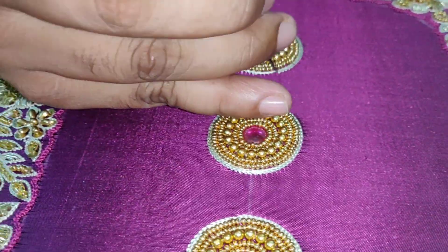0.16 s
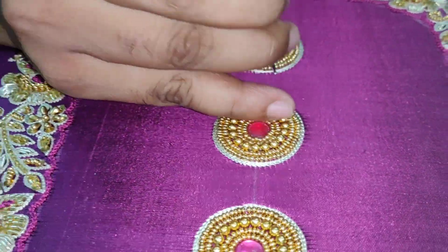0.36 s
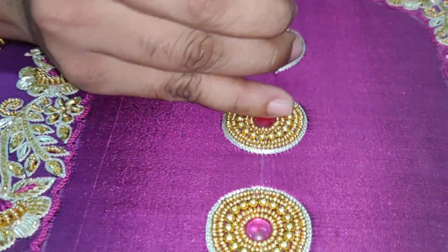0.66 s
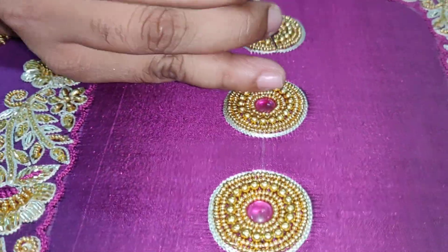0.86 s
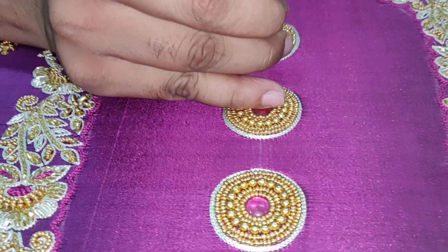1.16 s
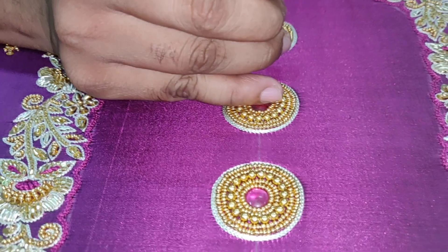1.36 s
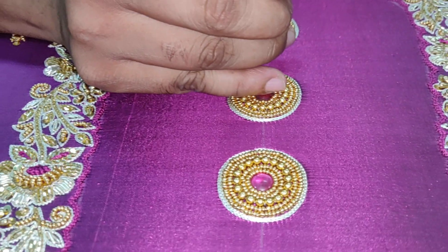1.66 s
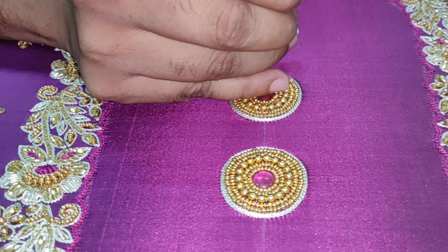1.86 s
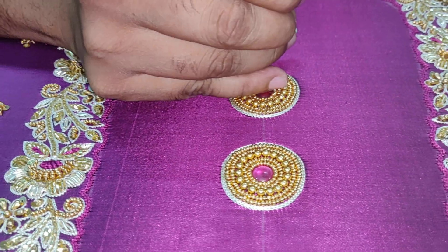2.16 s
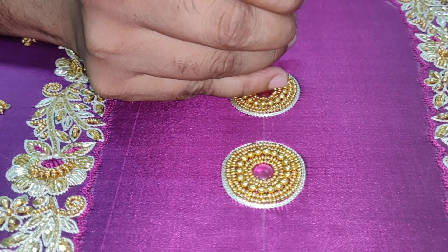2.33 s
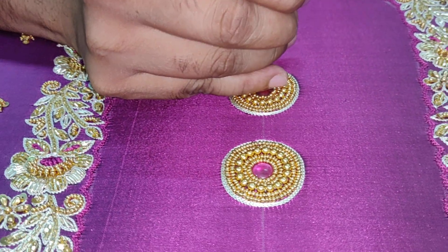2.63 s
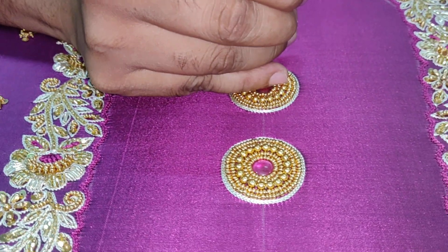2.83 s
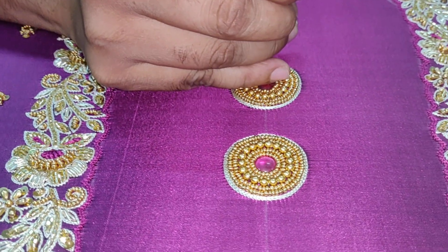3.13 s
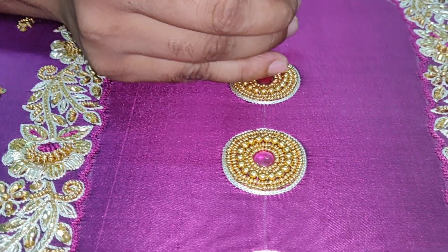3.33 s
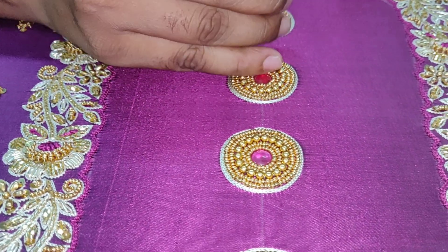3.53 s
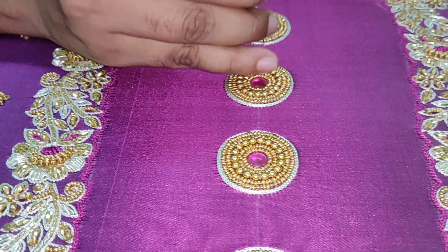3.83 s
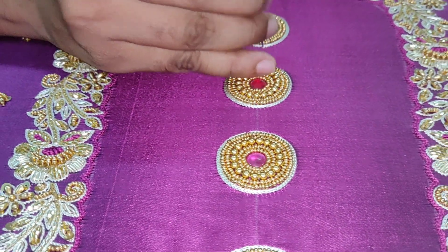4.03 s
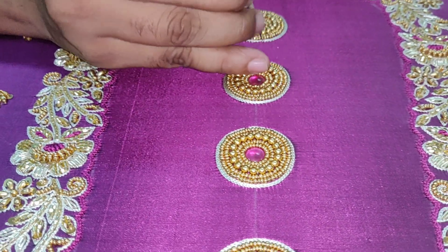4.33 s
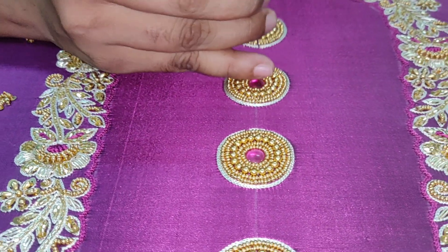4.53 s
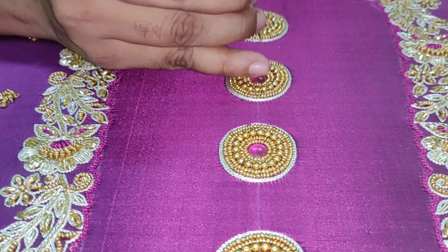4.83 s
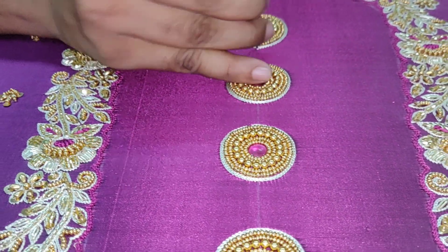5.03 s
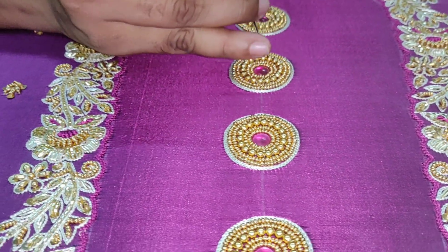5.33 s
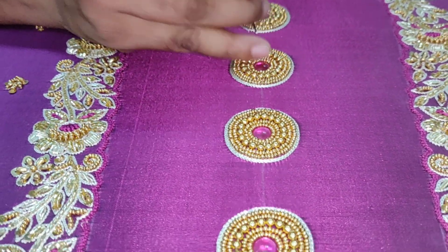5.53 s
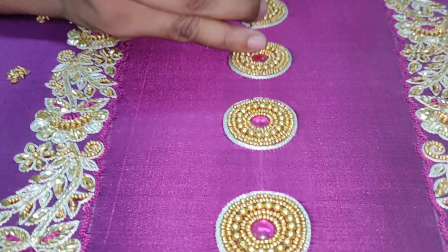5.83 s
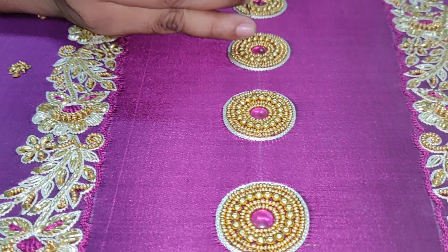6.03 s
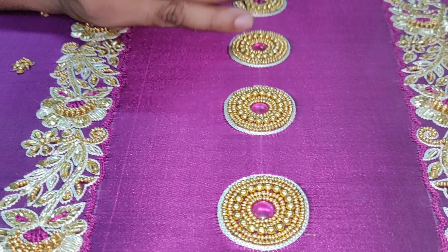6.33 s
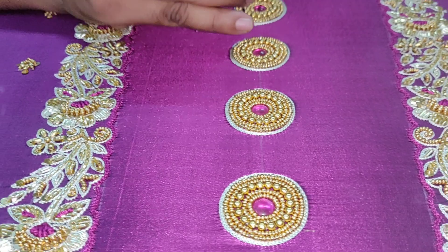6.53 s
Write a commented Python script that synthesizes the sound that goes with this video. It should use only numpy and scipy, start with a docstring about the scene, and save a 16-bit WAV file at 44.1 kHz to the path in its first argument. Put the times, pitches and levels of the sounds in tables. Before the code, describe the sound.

Close up in a small, hard room, a needle pierces taut cloth with a few hollow taps and crisp pops. A quieter stretch follows, with thread sliding and rasping, a few bead clicks and small ticks from the grip on the microphone. The needle then returns with a longer series of quick, soft knocks, the last ones strongest. A faint, high ringing hiss lies underneath throughout.

```python
"""A hooked embroidery needle is stabbed through silk stretched on a wooden frame, near a hand-held phone.
Each pass pops the weave and sets the cloth ringing in its membrane modes, like a slack drum.
Between stitches, thread is drawn through with stick-slip friction, beads click and the hand rubs the silk.
A small hard room adds reverberation. The grip on the phone ticks beside its right microphone port,
and the left port resonates faintly in its own hiss."""
import sys
import numpy as np
from scipy import signal
from scipy.fft import rfft, irfft
from scipy.io import wavfile
from scipy.ndimage import uniform_filter1d

SR = 44100
rng = np.random.default_rng(int(sys.argv[2]) if len(sys.argv) > 2 else 0)


def waveform_to_disk(signal):
    """Save audio, clipped to [-1, 1], as 16-bit WAV at the path in sys.argv[1]."""
    frames = np.transpose(np.atleast_2d(signal))
    scaled = np.clip(frames, -1, 1) * 32767
    samples = np.round(scaled).astype(np.int16)
    wavfile.write(sys.argv[1], SR, samples)


N = 294588
T = np.arange(N) / SR

# The thread snags on a bead, which clicks, and rasps free. Levels in all tables are relative.
# (time [s], click level [dB], click treble [dB], rasp level [dB], time constant of the tension [s])
BEAD_SNAGS = [(1.5957, -25.5, -6, -49, 0.044), (1.7206, -13.5, 1, -43, 0.062),
              (1.8103, -23, 1.5, -66, 0.085), (1.858, -35, 6, -66, 0.022), (2.733, -31.5, -7, -60, 0.024),
              (2.875, -37, 0, -81, .02), (3.209, -39, -2, -67.5, 0.064), (3.277, -38, 4, -66, 0.27),
              (3.765, -43, -2, -55, 0.058)]


def undb(db):
    """Decibels to amplitude ratio."""
    return 10 ** (np.asarray(db) / 20)


def unit(x):
    """Scale to rms 1."""
    return x / np.sqrt(np.mean(x ** 2))


def add(out, start_s, x):
    """Superpose x on out from start_s."""
    i = max(int(round(start_s * SR)), 0)
    out[i:i + len(x)] += x[:max(N - i, 0)]


def colour(x, points, column=1, size=8192):
    """Minimum-phase filter through points of (frequency [Hz], gain [dB])."""
    points = np.array(points, float)
    hz = np.maximum(np.arange(size // 2 + 1) * SR / size, 1)
    gain_db = np.interp(np.log(hz), np.log(points[:, 0]), points[:, column])
    cepstrum = irfft(np.log(undb(gain_db)))
    cepstrum[1:size // 2] *= 2  # folding the cepstrum makes the filter causal
    cepstrum[size // 2 + 1:] = 0
    impulse_response = irfft(np.exp(rfft(cepstrum)))
    return signal.fftconvolve(x, impulse_response)[:len(x)]


def brighten(x, db):
    """Shelving filter: raise or lower the treble by db."""
    return colour(x, [(5800, 0), (8500, db)], size=512)


def fade(t, t60):
    """Exponential decay, 60 dB down after t60."""
    return undb(-60 * t / t60)


def linger(x, decay_s):
    """Leaky integrator: each impulse falls to 1 / e in decay_s."""
    return signal.lfilter([1], [1, -np.exp(-1 / (decay_s * SR))], x)


def walk(rate_hz):
    """Smooth random modulation of rms 1: random steps, averaged twice."""
    hold = int(SR / rate_hz)
    steps = np.repeat(rng.standard_normal(N // hold + 1), hold)
    return unit(uniform_filter1d(uniform_filter1d(steps, hold), hold)[:N])


def pair(mid, side):
    """Left and right from mid and side."""
    return np.array([mid + side, mid - side])


def snap(t, t60, tail_db, tail_t60):
    """Noise with a two-stage decay: a sharp burst, then a short rustle."""
    return rng.standard_normal(len(t)) * (fade(t, t60) + undb(tail_db) * fade(t, tail_t60))


def slipping(spectrum, grain_db, flutter_db):
    """Stick-slip friction: stereo noise modulated by tiny slips that come in uneven runs."""
    slips = unit(undb(grain_db * walk(700) + flutter_db * walk(45)))
    return np.array([unit(colour(slips * rng.standard_normal(N), spectrum)) for _ in range(2)])


def needle_knocks(catch_pop_db=-7, catch_contact_ratio=2.17):
    """Needle impacts: (time, direction +1 in / -1 out, thump, pop, contact, deepest mode, treble)."""
    # The point goes in with one knock; the softest rows are the hand pressing lightly on the cloth just before
    # a stab: # (time [s], thump level [dB], pop level [dB], contact time [ms], deepest mode [dB], pop treble
    # [dB])
    stabs = [(0.096, -20, -58, 18, 6, 0), (.132, -33, -26, 1.9, 1, 3), (0.2971, -20, -13.5, 0.78, 0.5, 0.5),
             (.678, -18.5, -11, 0.7, 2, 0.5), (1.053, -20, -14, 0.45, 0.5, -2),
             (3.409, -26.5, -54, 2.3, 1, 0), (3.824, -31, -69, 1.2, -3, 0),
             (3.852, -32.5, -50, 0.94, -2.5, 0), (4.101, -30, -48, 2.2, 0.5, 0),
             (4.297, -35, -60, 2.7, 4.5, 0), (4.651, -19.5, -42, 2.04, 2, 5), (4.823, -32, -65, 1.8, 4, 0),
             (5.061, -21, -22, 0.44, -0.5, -9), (5.433, -27.5, -42, 2.2, -0.5, 9),
             (5.456, -27.5, -34.5, 0.78, -1, -3), (5.632, -25.5, -55, 4, -0.5, 2),
             (5.823, -20.5, -36, 1.7, -3.5, -10), (6.193, -20, -25, 1.7, -4, -11)]
    # The hook comes out, catches and knocks again, duller:
    # (the columns of stabs, delay of the second knock [s], its level against the first [dB])
    lifts = [(0.142, -24.5, -24, 1.96, 7, 3.5, 0.011, -11), (0.5142, -24, -32.5, 1.37, 5, 9.5, 0.015, -2),
             (0.8861, -18, -23.5, 0.89, -1.5, 1, 0.014, 4), (3.734, -25, -56, 3.9, 1.5, 2, 0.022, -21),
             (4.3335, -18, -16.5, 0.73, 1, -2.5, .019, -1.5), (4.8582, -22, -33.5, 1.45, 0.5, 1, 0.02, 3),
             (5.2782, -14, -18, 1.04, -2, -3, .013, -4), (5.6646, -12.5, -13.5, 1.08, -7, -1.5, 0.014, -7),
             (6.032, -14.5, -40, 2.4, -3.5, 6, 0.015, -10), (6.406, -11.5, -38.5, 2.17, -5, 5, 0.016, -13)]
    knocks = [(start, 1, *rest) for start, *rest in stabs]
    for start, thump, pop, contact, deep, treble, delay, catch_db in lifts:
        knocks.append((start, -1, thump, pop, contact, deep, treble))
        knocks.append((start + delay, -1, thump + catch_db, pop + catch_db + catch_pop_db,
                       contact * catch_contact_ratio, deep, treble))
    return knocks


def air(level_db=-51, swell_db=2):
    """Ambient noise: the still room's low rumble, partly coherent between the two ports."""
    # Spectrum of the still room: (frequency [Hz], level [dB])
    spectrum = [(20, 10.5), (55, -5.5), (100, -8), (170, -19), (420, -19.5), (650, -33.5), (1200, -29),
                (2200, -38), (5000, -36.5), (10000, -62), (16000, -44)]
    mid, side = (unit(colour(rng.standard_normal(N), spectrum)) for _ in range(2))
    side = colour(side, [(60, -1.5), (400, -1), (1500, -2)])
    return undb(level_db + swell_db * walk(4.17)) * pair(mid, side)


def room(x, t60=0.66, wet_db=-12.5, build_s=0.0095):
    """Diffuse reverberation: each side of the frame reaches each port by its own decaying tail."""
    # Colour of the reflections: (frequency [Hz], gain [dB])
    walls = [(40, -14.5), (150, 1), (380, -5), (510, 7.5), (590, 2.5), (750, 5.5), (2000, 1), (6000, 1),
             (16000, 0)]
    t = np.arange(SR * 3 // 4) / SR
    build_up = 1 - np.exp(-(t / build_s) ** 2)
    tails = rng.standard_normal((2, 2, len(t))) * fade(t, t60) * build_up
    tails /= np.sqrt(np.sum(tails ** 2, axis=(1, 2), keepdims=True))
    sent = np.array([colour(side, walls) for side in x])
    reflections = [signal.fftconvolve(sent, paths, axes=1).sum(0)[:N] for paths in tails]
    return undb(wet_db) * np.array(reflections)


def grip(small_db=-43, spread_db=5, small_ms=0.58, gain_db=0.5, rise_fraction=0.096, leak_hz=80,
         calm_per_s=7, restless_per_s=85):
    """Pressure pulses: the grip sends one-sided spikes into the right port; longer ones are duller."""
    # Strong ticks of the grip: (time [s], level [dB], decay time [ms])
    strong_ticks = [(.06, -20.5, 0.54), (.2291, -10.5, 0.044), (0.3945, -19.5, 0.11), (.421, -30, 0.13),
                    (.572, -30, 0.14), (.8102, -15, 0.31), (0.956, -27.5, 0.7), (1.1935, -25, 1),
                    (1.2639, -23.5, 0.72), (1.3132, -19.5, 0.56), (1.39, -30, .2), (1.4025, -24, 0.22),
                    (1.4102, -16.5, 0.51), (1.417, -26, 1), (1.518, -24.5, .3), (1.557, -21.5, 0.11),
                    (1.6638, -23.5, 0.54), (2.2452, -26, 1), (2.3674, -19.5, 0.4), (2.441, -26, 1),
                    (2.5696, -29.5, 1), (2.6046, -19, 0.76), (2.6646, -31, 0.23), (3.5219, -25.5, 0.59),
                    (4.0018, -27, 0.32), (4.9248, -28, 0.28), (5.1952, -25, 0.06)]
    # The grip shifts while the long thread is drawn: (start [s], end [s])
    restless_spans = [(1.15, 1.7), (2.3, 3.0)]
    restless = sum((T > start) & (T < end) for start, end in restless_spans)
    rate = np.where(restless, restless_per_s, calm_per_s)
    times = T[rng.random(N) < rate / SR]
    small_ticks = [(start, small_db + spread_db * min(strength, 2), small_ms * 2 ** stretch)
                   for start, (strength, stretch) in zip(times, rng.standard_normal((len(times), 2)))]
    t_ms = np.arange(SR // 100) * 1000 / SR
    right = np.zeros(N)
    for start, db, decay_ms in strong_ticks + small_ticks:
        spike = np.exp(-t_ms / decay_ms) * (1 - np.exp(-t_ms / (rise_fraction * decay_ms)))
        add(right, start, rng.choice([-1, 1]) * undb(gain_db + db) * spike)
    leak = signal.butter(1, leak_hz, "high", fs=SR, output="sos")
    return np.array([np.zeros(N), signal.sosfilt(leak, right)])


def sway(gain_db=-27, reach_s=0.1, settle_s=0.075, rest_db=-29, uneven_db=3.5):
    """Forced motion: the hand leans on the cloth before each knock; it heaves slowly, then settles."""
    # Spectrum of the heaving: (frequency [Hz], level [dB])
    spectrum = [(8, 5), (25, 2), (55, -2), (110, -15), (400, -30.5), (1500, -47.5), (6000, -69)]
    pushes = np.zeros(N)
    for start, _, thump_db, _, _, deep_db, _ in needle_knocks():
        add(pushes, start, [undb(thump_db + deep_db) ** 2])
    reaching = linger(pushes[::-1], reach_s)[::-1]
    effort = np.sqrt(undb(rest_db) ** 2 + linger(pushes, settle_s) + reaching)
    mid, side = (unit(colour(rng.standard_normal(N), spectrum)) for _ in range(2))
    return undb(gain_db + uneven_db * walk(17)) * effort * pair(mid, 0.3 * side)


def brush():
    """Friction on a membrane: the edge of the hand rubs the taut cloth, which murmurs like a drum skin."""
    # Strokes of the hand as it draws the thread: (centre time [s], half length [s], level [dB])
    strokes = [(1.532, 0.051, -48), (1.66, .04, -53)]
    # Spectrum of the rubbed cloth: (frequency [Hz], level [dB])
    spectrum = [(30, -1), (90, 0), (170, -1), (400, -10.5), (900, -25), (3000, -40)]
    pressure = sum(undb(db) * np.exp(-((T - centre) / half) ** 2) for centre, half, db in strokes)
    return pressure * slipping(spectrum, grain_db=4.5, flutter_db=1.5)


def thread(hiss_db=7, rasp_db=-6, snag_db=1, slack_db=-73.5, slack_rasp_db=-70, right_db=1,
           attack_s=0.041, release_s=0.06):
    """Stick-slip friction: thread hisses through the hole, with a lower, coarser rasp when it snags."""
    # Pulls of the thread: (start [s], length [s], level [dB])
    pulls = [(0.983, 0.25, -62), (1.143, 0.083, -66.5), (1.402, 0.27, -58), (1.445, .09, -60),
             (1.683, 0.097, -59.5), (2.002, 0.53, -61), (2.546, 0.24, -63), (2.892, 0.1, -62),
             (3.003, 0.15, -60), (3.187, 0.18, -64), (3.373, 0.16, -65), (3.721, 0.039, -56),
             (4.33, 0.061, -79), (5.67, 0.17, -66)]
    # Spectra of sliding and of tight thread: (frequency [Hz], level [dB])
    hiss_spectrum = [(1500, -10), (3000, -5.5), (5000, -4), (8000, 0), (10000, 2), (13000, 2.5), (16000, 2)]
    rasp_spectrum = [(250, -5), (400, 5.5), (620, 10.5), (850, 4), (1200, 4.5), (1800, 2.5), (2350, 4.5),
                     (3100, 0.5), (5000, -6.5)]
    speed, tension = np.zeros((2, N))
    for start, length, db in pulls:
        attack = np.clip((T - start) / attack_s, 0, 1)
        release = np.exp(-np.maximum(T - start - length, 0) / release_s)
        speed += undb(db) * attack * release
    for start, _, _, db, relax_s in BEAD_SNAGS:
        tension += undb(db) * (T > start) * np.exp(-np.abs(T - start) / relax_s)
    # Slack thread still rubs a little between pulls.
    hiss_envelope = undb(hiss_db) * np.hypot(speed, undb(slack_db))
    rasp_envelope = np.hypot(undb(rasp_db) * speed + undb(snag_db) * tension, undb(slack_rasp_db))
    hiss = hiss_envelope * slipping(hiss_spectrum, grain_db=1.5, flutter_db=2.2)
    rasp = rasp_envelope * slipping(rasp_spectrum, grain_db=3.5, flutter_db=4)
    balance = undb([[-right_db / 2], [right_db / 2]])
    return hiss * balance + rasp


def beads(gain_db=-7):
    """Hard impacts: beads knock together in short, broadband clicks."""
    # Spectrum of a click: (frequency [Hz], level [dB])
    spectrum = [(300, -12), (1300, 0.5), (2400, -3), (3000, -4.5), (7000, -5.5), (16000, -14)]
    t = np.arange(SR // 10) / SR
    out = np.zeros((2, N))
    for start, db, treble_db, _, _ in BEAD_SNAGS:
        for port in out:
            click = snap(t, t60=0.018, tail_db=-24, tail_t60=0.096)
            add(port, start, undb(gain_db + db) * brighten(click, treble_db))
    return np.array([colour(port, spectrum) for port in out])


def shudder(gain_db=-9, t60=0.14, rise_s=0.0035, width=0.94):
    """Modal overlap: after a quick pass, frame, cloth and beadwork tremble without a clear pitch."""
    # Envelope of the many weak modes of cloth and frame: (frequency [Hz], level [dB])
    spectrum = [(100, -12.5), (220, 11), (350, -3), (520, -4.5), (750, -8), (1100, -14.5), (2500, -18),
                (8000, -36)]
    t = np.arange(SR // 4) / SR
    mid, side = np.zeros((2, N))
    for start, _, thump_db, _, contact_ms, _, _ in needle_knocks():
        strength = undb(gain_db + thump_db) / np.hypot(1, contact_ms)
        envelope = strength * fade(t, t60) * (1 - np.exp(-t / rise_s))
        for part in (mid, side):
            add(part, start, envelope * rng.standard_normal(len(t)))
    return pair(colour(mid, spectrum), width * colour(side, spectrum))


def cloth(gain_db=-4.5, detune_spread=0.048, place_db=2, side_db=-15, spread_s=0.0034):
    """Membrane modes: each knock plucks the cloth; a longer contact excites only the low modes."""
    # Modes of the stretched cloth: (frequency [Hz], level [dB], time to decay by 60 dB [s])
    cloth_modes = [(68.2, 3, 0.086), (150, -5, 0.086), (172.7, -1, 0.051), (240, -21.5, 0.027),
                   (328.2, -19, 0.15), (407.7, -12, 0.078), (456.7, -9.5, 0.072), (502.6, -16, 0.088),
                   (673, -11, 0.044), (770, -12.5, 0.041), (1107, -5, 0.019)]
    hz, mode_db, t60 = np.transpose(cloth_modes)[:, :, None]
    polarity = (-1) ** np.arange(len(cloth_modes))[:, None]  # neighbouring modes swing in opposition
    t = np.arange(SR // 4) / SR
    mid, side = np.zeros((2, N))
    for start, direction, thump_db, _, contact_ms, deep_db, _ in needle_knocks():
        detune, place, pan = rng.standard_normal((3, len(cloth_modes), 1))
        contact_lowpass = 1 / np.hypot(1, 2 * (hz * contact_ms / 1000) ** 2)
        level_db = gain_db + thump_db + mode_db + place_db * place
        gain = direction * polarity * contact_lowpass * undb(level_db)
        gain[0] *= undb(deep_db)  # the deepest mode depends on where the point lands
        modes = gain * np.sin(2 * np.pi * hz * (1 + detune_spread * detune) * t) * fade(t, t60)
        modes *= 1 - np.exp(-t / spread_s)  # the wave needs a moment to spread over the frame
        add(mid, start, modes.sum(0))
        add(side, start, undb(side_db) * (pan * modes).sum(0))
    return pair(mid, side)


def weave(gain_db=-9, crack_db=13, crack_hz=5800, crack_t60=0.0011, echo_s=0.0036, echo_db=-14,
          width=0.73):
    """Sudden stress release: the tip cracks through the weave with a pop, and fibres slip after it."""
    # The weave giving way: (frequency [Hz], level going in [dB], level coming out [dB])
    spectra = [(200, -5, 6), (644, 2, -5), (920, -1, -19), (1580, -9, -6), (1730, 0.5, -1.5),
               (2430, -9.5, -5.5), (2630, 3.5, -1), (4320, -9, -5), (6240, -8.5, -6.5), (10400, -2, 1),
               (16000, 6, -6)]
    t = np.arange(SR // 10) / SR
    crack = undb(crack_db) * np.cos(2 * np.pi * crack_hz * t) * fade(t, crack_t60) / 2
    mid, side = np.zeros((2, N))
    for start, direction, _, pop_db, _, _, treble_db in needle_knocks():
        mid_slips, side_slips = (snap(t, t60=0.014, tail_db=-35, tail_t60=0.05) for _ in range(2))
        for part, burst in ((mid, mid_slips + direction * crack), (side, side_slips)):
            shaped = colour(burst, spectra, column=1 if direction > 0 else 2, size=1024)
            pop = undb(gain_db + pop_db) * brighten(shaped, treble_db)
            add(part, start, pop)
            # Two faint echoes of the pop, at random short delays.
            for delay in echo_s * rng.uniform(0.6, 1.4, size=2):
                add(part, start + delay, undb(echo_db) * pop)
    return pair(mid, width * side)


def scene():
    """Superposition: the needlework and its reverberation, with room noise, sway and grip left dry."""
    needlework = cloth() + shudder() + weave() + beads() + thread() + brush()
    return needlework + room(needlework) + air() + sway() + grip()


def record(dry, hiss_db=-38, cutoff_hz=15800):
    """Cavity resonance: each microphone port colours the sound and rings in its hiss; the top is cut."""
    # Response of the ports: (frequency [Hz], left gain [dB], right gain [dB])
    port_response = [(1010, 6, 5), (3140, 3.5, 3), (5770, 9, 7), (6300, 16.5, 2.5), (6890, 6.5, 3),
                     (8830, -8, 4), (10250, -26, -16), (11200, -35, -23), (13700, -15, -15),
                     (15300, -20, -13), (17100, 3, -12)]
    # Hiss of each microphone, ringing in its port: (frequency [Hz], level [dB])
    left_hiss = [(2000, -24), (4300, -23), (5600, -12), (6050, -2), (6300, 0), (6550, -2), (6900, -10),
                 (7250, -25), (9600, -33), (15500, -30)]
    right_hiss = [(2000, -24), (4300, -24), (5200, -18), (5700, -19), (6300, -13), (6900, -16), (7250, -24),
                  (8700, -24), (9600, -34), (15500, -30)]
    hiss = [colour(rng.standard_normal(N), spectrum) for spectrum in (left_hiss, right_hiss)]
    ports = [colour(x, port_response, column=k + 1) + undb(hiss_db) * hiss[k] for k, x in enumerate(dry)]
    lowpass = signal.ellip(8, 0.2, 70, cutoff_hz, fs=SR, output="sos")
    return signal.sosfilt(lowpass, ports)


dry = scene()
out = record(dry)
waveform_to_disk(out)
```